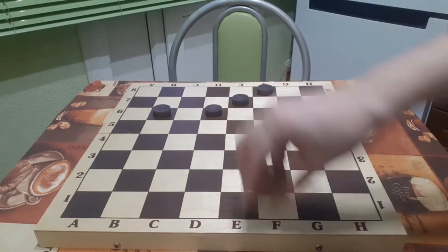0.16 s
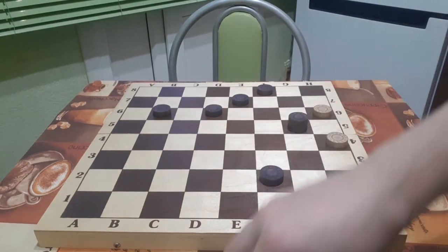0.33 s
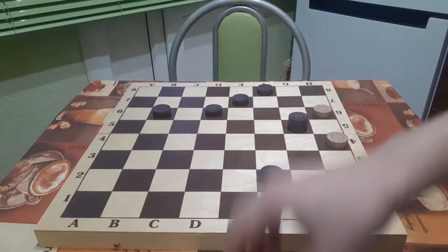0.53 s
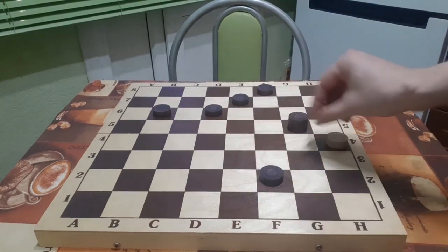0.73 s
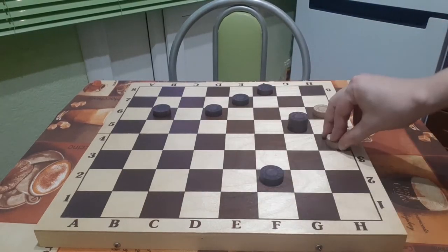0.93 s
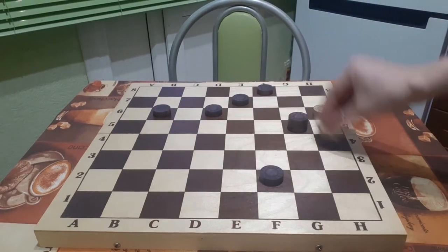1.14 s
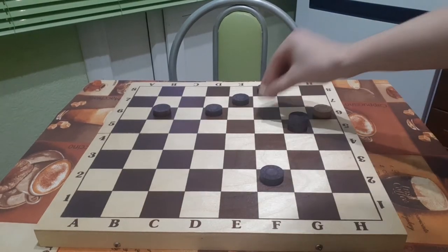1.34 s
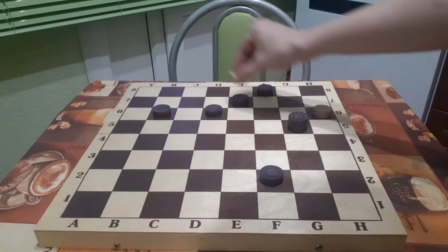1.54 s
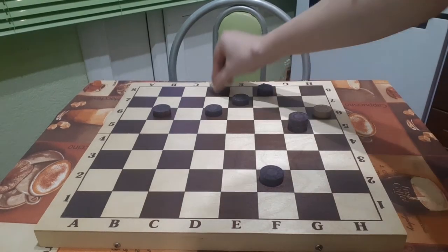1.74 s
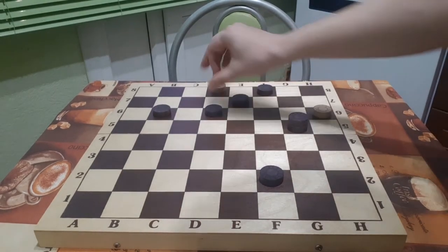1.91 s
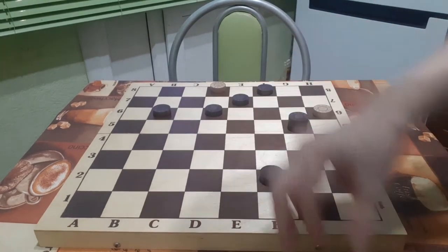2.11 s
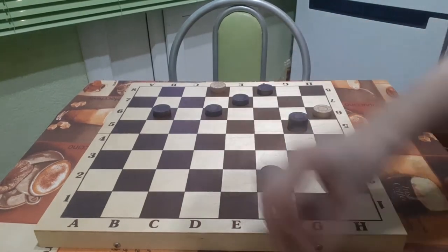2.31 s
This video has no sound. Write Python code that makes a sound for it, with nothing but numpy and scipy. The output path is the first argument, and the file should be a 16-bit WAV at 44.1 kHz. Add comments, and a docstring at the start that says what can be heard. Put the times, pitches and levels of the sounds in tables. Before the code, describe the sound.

Close stereo pickup of board game pieces being moved: quiet taps first, then two hard, bright wooden clacks under half a second apart, brief room ring, a muffled touch at the end, low appliance hum behind.

```python
"""Draughts pieces on a hollow board

Wooden pieces on a folding board in a small, hard-walled kitchen: two sharp clacks among softer touches.
Contacts are filtered clicks with a dense noise ring; board, table and piece add decaying sine modes.
Swells of grainy band noise give a touch's dull end, a tiny tick and soft scuffs.
A decaying noise tail is the room's answer; phase-wavering sines hum like an appliance in noisy air."""
import sys
import numpy as np
from scipy import signal
from scipy.fft import rfft, irfft, next_fast_len
from scipy.io import wavfile
from scipy.ndimage import uniform_filter1d, map_coordinates

SR = 44100
rng = np.random.default_rng(int(sys.argv[2]) if len(sys.argv) > 2 else 0)


def store_wav(level_fs):
    """Save 16-bit WAV to argv[1]."""
    pcm = np.round(np.clip(np.atleast_2d(level_fs), -1, 1) * 32767)
    wavfile.write(sys.argv[1], SR, pcm.T.astype(np.int16))


N = 108486  # samples


def amp(db):
    """Decibels to gain."""
    return 10 ** (np.asarray(db) / 20)


def unit(x):
    """Scale to rms 1."""
    return x / np.sqrt(np.mean(x ** 2) + 1e-20)


def along(points, hz):
    """Interpolate (frequency, value) points on a log-frequency axis."""
    point_hz, values = np.transpose(points)
    return np.interp(np.log(hz + 1), np.log(point_hz + 1), values)


def wobble(rate_hz, size):
    """Smooth random curve with rate_hz knots a second."""
    knots = rng.standard_normal(int(size * rate_hz / SR) + 4)
    return map_coordinates(knots, [np.arange(size) * rate_hz / SR])


def coloured(x, gain):
    """Minimum-phase filter with gain(hz), from the folded cepstrum."""
    m = 2 * next_fast_len(x.shape[-1])
    log_gain = np.log(np.maximum(gain(np.fft.rfftfreq(m, 1 / SR)), 1e-6))
    cepstrum = irfft(log_gain)
    cepstrum[1:m // 2] *= 2
    cepstrum[m // 2 + 1:] = 0
    return irfft(rfft(x, m) * np.exp(rfft(cepstrum)))[..., :x.shape[-1]]


def noise_pair(alike, size):
    """White stereo noise; the mid/side balance sets left-right likeness per frequency."""
    likeness = np.clip(along(alike, np.fft.rfftfreq(size, 1 / SR)), -1, 1)
    turn = np.arccos(likeness) / 2
    spectra = np.exp(2j * np.pi * rng.random((2, len(turn))))
    mid, side = irfft(spectra * [np.cos(turn), np.sin(turn)], size)
    return unit(np.array([mid + side, mid - side]))


def fade(t, t60_s):
    """Exponential decay, 60 dB in t60_s."""
    return np.exp(-np.log(1000) * t / t60_s)


def add(out, start_s, x):
    """Mix x into out at start_s."""
    i = max(round(start_s * SR), 0)
    out[:, i:i + x.shape[-1]] += x[..., :N - i]


# Room decay: (frequency [Hz], T60 [s])
ROOM_T60 = [(100, .36), (300, 0.31), (1800, 0.3), (5000, 0.31), (9000, 0.28), (15000, .24)]
# Diffuse left-right likeness: (frequency [Hz], correlation [-1..1])
DIFFUSE_ALIKE = [(100, 0.88), (300, 0.68), (700, .5), (1400, 0.055), (10000, 0)]
ROOM_DB, ROOM_BUILD_S, ROOM_GAP_S = 4, 0.016, 0.002


def room(x, db):
    """Kitchen's answer: a noise tail builds after a gap, each frequency decaying at its own rate."""
    hz, t, z = signal.stft(noise_pair(DIFFUSE_ALIKE, SR // 2), SR, nperseg=256)
    decaying = z * fade(t, along(ROOM_T60, hz)[:, None])
    tail = signal.istft(decaying, SR, nperseg=256)[1]
    late_s = np.maximum(np.arange(tail.shape[1]) / SR - ROOM_GAP_S, 0)
    tail = tail * np.sqrt(1 - np.exp(-late_s / ROOM_BUILD_S))
    tail = tail / np.linalg.norm(tail[0])
    return amp(db) * signal.fftconvolve(x, tail, axes=1)[:, :x.shape[1]]


# Appliance hum partials: (frequency [Hz], rms level [dB])
HUM = [(70, -84.5), (100, -70), (156, -66), (200, -79.5), (298, -71.5), (312, -76), (801, -88.5),
       (1776, -95)]
# Room-air spectrum: (frequency [Hz], relative level [dB])
AIR = [(15, -54), (25, -24), (136, -3), (173, -2.5), (240, -9), (305, -4), (598, -22.5), (782, -20.5),
       (919, -28), (1490, -29), (1750, -30), (3830, -31.5), (15500, -33)]
HUM_WAVER_RAD, AIR_DB = 0.71, -65.5


def background():
    """Appliance hum of phase-wavering sines, the same in both ears, in diffuse air noise."""
    t = np.arange(N) / SR
    hum = np.zeros(N)
    for hz, db in HUM:
        phase = HUM_WAVER_RAD * wobble(20, N)
        hum += amp(db) * unit(np.sin(2 * np.pi * hz * t + phase))
    air = coloured(noise_pair(DIFFUSE_ALIKE, N), lambda hz: amp(along(AIR, hz)))
    return hum + amp(AIR_DB) * unit(air)


# Short band-noise sounds: the dull end of a touch, a tiny tick, soft scuffs:
# (swell centre [s], Gaussian sigma [s], level [dB], centre frequency [Hz], width [octaves])
SMALL_NOISES = [(0.002, 0.0024, -44, 657, .22), (0.8894, .0012, -58, 5870, 0.24),
                (1.08, 0.0082, -64.5, 5600, 0.41), (1.089, .008, -63.5, 1092, .9),
                (2.233, .005, -57, 3470, .4)]
# Direct-sound left-right likeness: (frequency [Hz], correlation [-1..1])
DIRECT_ALIKE = [(300, 0.84), (1500, 0.2), (4000, 0.9), (12000, 0.24)]
GRAIN_DB, GRAIN_RATE_HZ = 5.5, 400


def small_noises():
    """Short sounds: band noise with random grain under a Gaussian swell, plus room."""
    t, noises = np.arange(N) / SR, np.zeros((2, N))
    for centre_s, sigma_s, db, centre_hz, octaves in SMALL_NOISES:
        band = lambda hz: np.exp(-0.25 * (np.log2((hz + 1) / centre_hz) / octaves) ** 2)
        grain = unit(amp(GRAIN_DB * wobble(GRAIN_RATE_HZ, N)))
        hiss = unit(coloured(noise_pair(DIRECT_ALIKE, N), band))
        swell = np.exp(-0.5 * ((t - centre_s) / sigma_s) ** 2)
        noises += amp(db) * swell * grain * hiss
    return noises + room(noises, ROOM_DB)


MODE_WAVER_RAD, MODE_RISE_S = 0.5, 0.0046
EAR_SPREAD_RAD = 0.6  # at 500 Hz, proportional to frequency


def mode(t, hz, t60_s):
    """Low resonance: builds up, decays and drifts in phase, partly separately at each ear."""
    ears = np.array([wobble(22, len(t)), wobble(25, len(t))])
    phase = MODE_WAVER_RAD * wobble(42, len(t)) + EAR_SPREAD_RAD * hz / 500 * ears
    return np.sin(2 * np.pi * hz * t + phase) * fade(t, t60_s) * (1 - np.exp(-t / MODE_RISE_S))


# Piece meets board: (time [s], click level [dB], knock level [dB], boom level [dB],
# hardness corner [Hz], place [0 inner square..1 far edge])
CONTACTS = [ (0.001, -19.5, -22, -53, 5240, 0), (1.3993, 18.5, 3.5, -23, 11500, 0.035),
            (1.4037, 18.5, 7.5, -30, 7500, 0.044), (1.779, 7.5, 3.5, -28, 12000, 1),
            (1.7809, 18.5, 12.5, -18.5, 10500, 0.99), (1.7848, 17, 3, -42, 10500, 1)]
# Board modes: (frequency [Hz], T60 [s], inner-square level [dB], far-edge level [dB])
BOARD = [(195.2, 0.31, -1.5, -15.5), (281, 0.19, -13, -2.5), (343, .17, -10.5, 0.5), (406.2, .34, -9, -9.5),
         (550, 0.26, -3, -24), (670, 0.32, -12.5, -9), (1033, 0.35, -20.5, -12), (1103, .2, -12.5, -9.5),
         (1216, 0.21, -13.5, -1.5), (1387, 0.14, -19, -8)]
# Thumps of table and board box: (time [s], frequency [Hz], level [dB])
THUMPS = [(0.434, 134, -39.5), (0.436, 304.6, -46.5), (0.885, 244, -47), (1.398, 135, -30),
          (2.224, 134, -39), (2.224, 200, -50.5)]
THUMP_T60_S = 0.36


def booms():
    """Hollow-board modes, weighted by strike place, and single-mode low thumps."""
    out, t = np.zeros((2, N)), np.arange(SR // 2) / SR
    for start_s, _, _, boom_db, _, place in CONTACTS:
        edge = np.clip(place, 0, 1)
        for hz, t60_s, inner_db, edge_db in BOARD:
            db = boom_db + inner_db + edge * (edge_db - inner_db)
            add(out, start_s, amp(db) * mode(t, hz, t60_s))
    for start_s, hz, db in THUMPS:
        add(out, start_s, amp(db) * mode(t, hz, THUMP_T60_S))
    return out


RING_DB, RING_RISE_S = 11.5, 0.001  # ring level re crack
RING_TO_ROOM = 0.65  # ring gain in the room feed
PAN_DB = -0.5  # left; right gets the opposite


def strike(colour, hard_hz, t60_s, room_db):
    """Impulse crack plus dense noise ring, with room; a softer touch rolls off lower."""
    t = np.arange(SR // 2) / SR
    dulled = lambda hz: colour(hz) / np.hypot(1, (hz / hard_hz) ** 2)
    crack = 1.0 * np.array([t == 0, t == 0])
    ring = noise_pair(DIRECT_ALIKE, len(t)) * fade(t, t60_s) * (1 - np.exp(-t / RING_RISE_S))
    ring = ring / np.linalg.norm(ring[0])
    near = crack + amp(RING_DB) * ring
    far = crack + RING_TO_ROOM * ring[0]
    near, far = near / np.linalg.norm(near[0]), far / np.linalg.norm(far[0])
    return coloured(near + room(far, room_db), dulled)


# Soft touches, and captured pieces laid on the table:
# (time [s], clink level [dB], thud level [dB], hardness corner [Hz], room level [dB])
TOUCHES = [ (0.4272, -18, -17, 8840, 2.5), (0.4305, -3, -13, 16700, -20), (0.4364, -4.5, -5.5, 7160, 3),
           (0.4389, 1.5, -11.5, 5950, -1), (0.884, -27, -10, 1894, 4.5), (2.224, -24, -9, 1170, 4.5)]
# Free piece's ring spectrum: (frequency [Hz], level [dB])
CLINK = [(100, -40), (1000, -19), (1900, -10), (2600, -3.5), (2950, -1.5), (3400, -5), (4380, 0),
         (4950, -3), (5500, 1), (6100, -4), (6900, -1), (7800, -4.5), (9400, -5), (10250, 5.5),
         (11000, 0.5), (11700, -0.5), (12800, -15), (15500, -20)]
# Dull surface spectrum: (frequency [Hz], level [dB])
THUD = [(40, -12), (90, -4), (200, 3), (310, 5), (450, -5), (660, -4), (1000, -12), (1550, -14),
        (2200, -24), (9000, -45)]
CLINK_T60_S = 0.011


def touches():
    """Light contacts: a brief clink of the free piece over the surface's thud."""
    out = np.zeros((2, N))
    for start_s, clink_db, thud_db, hard_hz, room_db in TOUCHES:
        wood = lambda hz: np.hypot(amp(clink_db + along(CLINK, hz)), amp(thud_db + along(THUD, hz)))
        add(out, start_s, strike(wood, hard_hz, CLINK_T60_S, room_db))
    return out * amp([[PAN_DB], [-PAN_DB]])


# Struck piece's modes, hanging in the room:
# (frequency [Hz], inner-square level [dB], far-edge level [dB])
PIECE = [(2605, -4.5, -8), (2834, -0.5, -13.5), (3060, -0.5, -12.5), (3390, -6, -8.5), (3980, -4.5, -8.5),
         (4000, -10.5, -0.5), (4375, -3.5, -6.5), (5350, -4, -1.5), (5720, -6.5, 2.5), (5720, -4.5, -11.5),
         (6730, -10, -2.5), (6550, -5.5, 0)]
PIECE_T60_S, PIECE_DB, PIECE_WAVER_RAD = 0.24, -45.5, 1  # level re click


def pings():
    """High modes of the hard disc, weighted by strike place, random start phase per ear."""
    out, t = np.zeros((2, N)), np.arange(SR // 2) / SR
    envelope = fade(t, PIECE_T60_S) * (1 - np.exp(-t / RING_RISE_S))
    for start_s, click_db, _, _, _, place in CONTACTS:
        edge = np.clip(place, 0, 1)
        for hz, inner_db, edge_db in PIECE:
            phase = 2 * np.pi * rng.random((2, 1)) + PIECE_WAVER_RAD * wobble(60, len(t))
            db = PIECE_DB + click_db + inner_db + edge * (edge_db - inner_db)
            add(out, start_s, amp(db) * envelope * np.sin(2 * np.pi * hz * t + phase))
    return out


# Hard-contact spectrum: (frequency [Hz], level [dB])
CLICK = [(100, -38.5), (900, -18.5), (1900, -9), (2400, -4.5), (2950, -2), (3500, -2), (4250, -1.5),
         (4800, -2.5), (5300, -0.5), (6100, -4), (6900, -1), (8800, -9), (10300, -9), (12500, -9),
         (15500, -8.5)]
# Board top-plate spectrum: (frequency [Hz], level [dB])
KNOCK = [(40, -31), (85, -23), (150, -7.5), (320, 3), (490, -8), (680, 1.5), (820, -9), (1200, 0),
         (1700, -2.5), (3000, -13), (9000, -39.5)]
RING_T60_S = 0.025


def clacks():
    """Pieces land, one rim first and then flat: each contact is a hard click over a plate knock."""
    out = np.zeros((2, N))
    for start_s, click_db, knock_db, _, hard_hz, _ in CONTACTS:
        wood = lambda hz: np.hypot(amp(click_db + along(CLICK, hz)), amp(knock_db + along(KNOCK, hz)))
        add(out, start_s, strike(wood, hard_hz, RING_T60_S, ROOM_DB))
    return out * amp([[PAN_DB], [-PAN_DB]])


def scene():
    """Sum of all layers."""
    return background() + small_noises() + booms() + touches() + pings() + clacks()


DUCK_ABOVE_DB, DUCK_SHARE = -26.5, 0.17  # threshold; dB of cut per dB above it
DUCK_CREEP_DB_PER_S, DUCK_SMOOTH_S = 1, 0.02
TOP_HZ = 15900


def record(dry):
    """Gain control: loud hits cut the gain, the cut also deepens steadily; then a steep low-pass."""
    power = np.abs(uniform_filter1d(np.mean(dry ** 2, axis=0), 256))
    level_db = 10 * np.log10(power + 1e-12)
    creep_db = DUCK_CREEP_DB_PER_S * np.arange(N) / SR
    wanted_db = DUCK_SHARE * np.maximum(level_db - DUCK_ABOVE_DB, 0)
    duck_db = np.maximum.accumulate(wanted_db - creep_db) + creep_db
    keep = np.exp(-1 / (DUCK_SMOOTH_S * SR))
    held = dry * amp(-signal.lfilter([1 - keep], [1, -keep], duck_db))
    m = next_fast_len(N + SR // 2)
    low_pass = 1 / np.hypot(1, (np.fft.rfftfreq(m, 1 / SR) / TOP_HZ) ** 80)
    return irfft(rfft(held, m) * low_pass, m)[:, :N]


dry = scene()
out = record(dry)
store_wav(out)
```